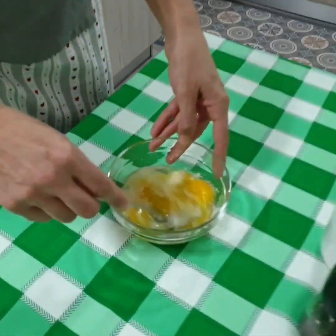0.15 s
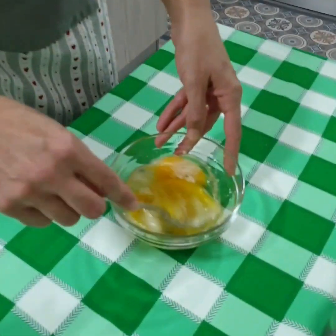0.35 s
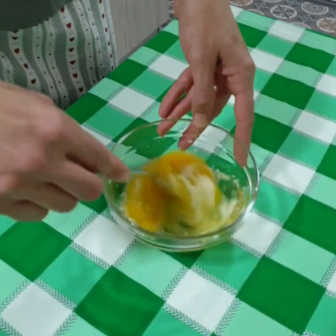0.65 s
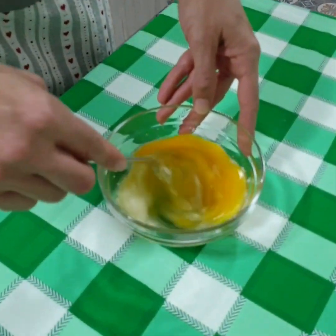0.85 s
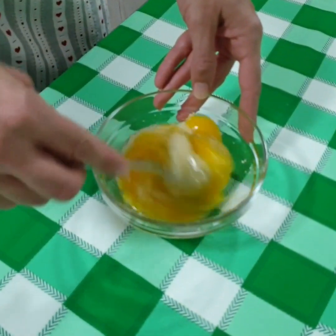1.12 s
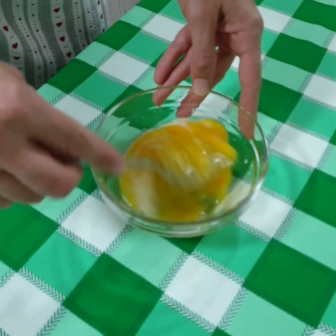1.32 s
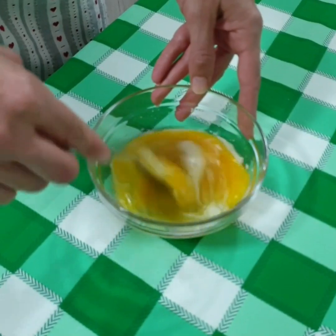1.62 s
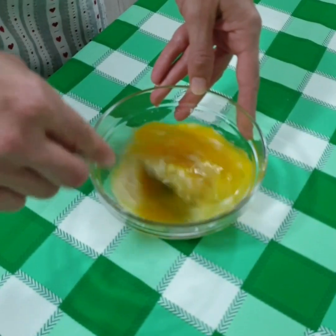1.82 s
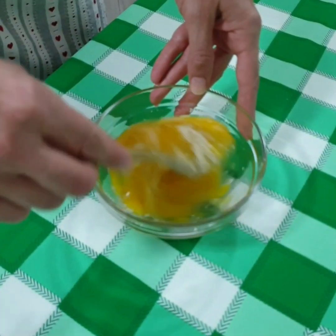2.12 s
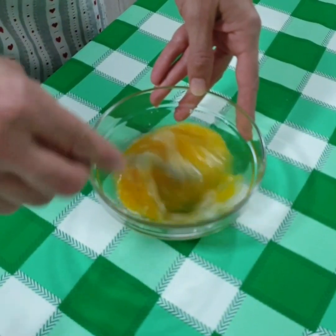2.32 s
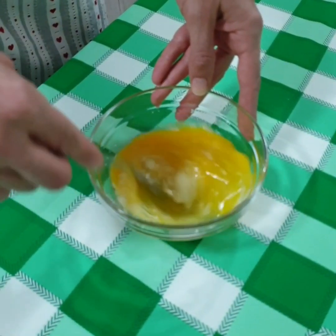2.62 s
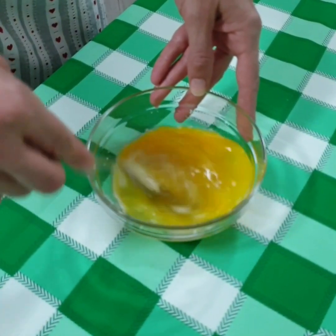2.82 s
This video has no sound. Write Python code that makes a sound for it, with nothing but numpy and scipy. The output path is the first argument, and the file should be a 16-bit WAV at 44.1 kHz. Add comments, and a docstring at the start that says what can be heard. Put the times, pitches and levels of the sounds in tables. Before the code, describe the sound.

A fork beats raw eggs in a glass bowl from 0 to about 2.9 seconds, five even strokes per second. Each brings a skid, bright ticks, dull clacks, usually a double knock, and a low table thump, with small wet plops and crackles. A short bright glass clink rings at 1.2, and a harsh metallic clash bounces at 1.8. Close stereo microphone, slightly left, lively kitchen, faint steady background noise.

```python
"""A hard-walled kitchen, a close stereo microphone: a fork beats raw eggs in a glass bowl on a table.
About five strokes a second, tines graze the side and knock on the bottom, usually twice: skidding noise,
short pings and dull clacks. Each knock thumps the table in low sines; the egg plops, gulps and crackles.
Once the bare glass rings in decaying modes, once the fork clashes and bounces on the wall.
Noise tails and standing waves make the room, over a steady noise floor."""
import sys
import numpy as np
from scipy import signal
from scipy.fft import rfft, irfft, next_fast_len
from scipy.io import wavfile
from scipy.ndimage import uniform_filter1d

SR = 44100
rng = np.random.default_rng(int(sys.argv[2]) if len(sys.argv) > 2 else 0)


def master(y):
    """Save y as 16-bit WAV."""
    cut = np.clip(np.atleast_2d(y).T, -1, 1)
    pcm = np.round(cut * 32767)  # scale
    wavfile.write(sys.argv[1], SR, pcm.astype(np.int16))


N = 130095

# Event and mode levels are relative; the trims further down shift them.
# tines knock on the bottom [t/s, tick level/dB, clack level/dB, thump level/dB, thump f/Hz, thump swell/s]
BOTTOM_KNOCKS = [(0.0329,-29,-39,-31,226,0.0038),(0.0588,-33,-36,-27.5,227,0.0037),(.228,-28.5,-41,-24.5,234,0.0036),(.2577,-26.5,-34,-25.5,246,.003),
                 (0.4228,-25,-34.5,-23.5,260.5,0.0039),(0.4494,-31.5,-35,-32.5,217,0.0037),(0.626,-26.5,-40.5,-24,265,0.0035),(.6516,-35,-35,-30,234,0.0043),
                 (.8185,-27,-65,-30,248,0.0032),(0.8344,-44,-42.5,-29.5,208,0.0032),(1.0193,-30.5,-47,-26.5,239,0.0049),(1.0432,-36,-41.5,-28,225,0.0033),
                 (1.213,-23.5,-38,-23,254,0.0035),(1.2431,-26,-31,-24.5,200,0.0032),(1.4142,-28.5,-38.5,-24,253.4,0.00344),(1.446,-33.5,-37.5,-28,206,0.0028),
                 (1.618,-30,-36,-23.5,228.5,0.0045),(1.654,-34,-37,-28,225,0.0034),(1.823,-29,-31.5,-22.5,235,0.0028),(1.855,-37,-37,-29,194,.003),
                 (2.027,-33,-35.5,-26,245.6,0.0031),(2.2279,-30,-36,-23,253.5,0.0041),(2.431,-30,-37,-26,226,0.0044),(2.4589,-34.5,-39,-30,244,0.0031),
                 (2.6426,-31.5,-44,-29.5,212,0.0056),(2.6638,-29,-33,-28,248,0.0028),(2.8648,-44,-36,-27.5,248,0.0032)]
# tines graze the side [t/s, tick level/dB, clack level/dB]
SIDE_GRAZES = [(.1968,-44,-43),(.4004,-62,-52),(.5969,-26,-32.5),(.7888,-34,-62),(.7957,-36,-46),(1.2033,-28.5,-42.5),(1.3853,-31,-35.5),
               (1.5857,-24,-35.5),(1.9947,-31.5,-40.5),(2.3878,-27.5,-46),(2.414,-55,-53),(2.606,-36,-43),(2.8056,-24,-31),(2.8985,-68,-60)]
# fork clashes on the wall [t/s, level/dB]
WALL_CLASHES = [(1.7967,-26.5),(1.7992,-18.5),(1.8084,-33),(1.822,-31)]
# fork rings the bare glass, one event [t/s, ring level/dB, crack level/dB]
GLASS_CLINK = (1.216,-6.5,-14.5)
# air pockets close in the egg [t/s, starting f/Hz, level/dB]
EGG_PLOPS = [(0.595,1116,-34.5),(.798,732,-43),(.982,900,-43.5),(1.02,616,-41.5),(1.412,880,-42.5),(1.68,590,-39),
             (1.80,748,-38),(2.342,900,-45),(2.342,1500,-51.5),(2.385,977,-45.5),(2.575,1260,-48.5),(2.603,900,-49.5),(2.802,1400,-43),(2.807,900,-41.5)]
# modes of the bowl damped by egg and fingers [f/Hz, relative level/dB, t60/s]
BOWL_MODES = [(900,-19,0.046),(1172,-18.5,0.043),(1400,-20.5,0.055),(2446,-19,0.091),(3114,-16,0.047),(4390,0,0.033),(4406,-7,0.02),(4800,-14.5,.07),(5000,-7,0.037),(6200,-3,0.033),(6497,2,0.031),(6550,-1.5,.035),(8920,-2,0.043),(11573,-9.5,0.039),(14493,-15,0.074)]
# dull modes of the full bowl, before chance detuning [f/Hz, relative level/dB, t60/s]
CLACK_MODES = [(880,-13,0.011),(1620,-49,0.0081),(2127,0.5,0.014),(2610,1,0.013),(3106,-0.5,0.011),(4170,-6,0.0085)]
# spectrum of tines skidding on glass [f/Hz, relative level/dB]
TICK_SPECTRUM = [(300,-9.5),(600,-10.5),(1100,-13),(2500,-11.5),(4200,-3),(5800,-2),(7300,3),(8600,-1.5),(9600,-8.5),(12500,-6.5),(15300,1.5),(17000,-7.5)]
# spectrum of the fork on the wall [f/Hz, relative level/dB]
CLASH_SPECTRUM = [(100,-17.5),(700,-10.5),(1100,-18.5),(2400,-11.5),(3200,1.5),(4200,-0.5),(5800,-4.5),(7500,1),(9100,-9.5),(10400,-5),(13000,-8.5),(16000,-20)]
# spectrum of the crack on bare glass [f/Hz, relative level/dB]
CRACK_SPECTRUM = [(200,-5),(1200,3),(3200,-11),(5000,9.5),(8000,1.5),(12000,1),(16000,7)]
# colour of the kitchen's reflections [f/Hz, relative level/dB]
ROOM_SPECTRUM = [(60,-20.5),(150,-16),(270,-5),(380,-9.5),(520,-2.5),(850,2),(2200,-1.5),(4500,-2),(8000,-4),(12000,-0.5),(16000,1.5)]
# spectrum of the noise floor [f/Hz, relative level/dB]
FLOOR_SPECTRUM = [(25,-14),(60,-12.5),(130,1.5),(260,-5),(500,-25.5),(1000,-29),(3000,-27),(8000,-20.5),(16000,-23)]
# decay of the kitchen's diffuse tail [f/Hz, t60/s]
ROOM_DECAY = [(100,0.66),(500,0.58),(1500,0.57),(4000,0.42),(9000,0.32),(16000,.25)]
# low standing waves between the walls [f/Hz, relative level/dB, t60/s]
STANDING_WAVES = [(64,-1,0.59),(98.7,-6.5,0.67),(136.9,6,0.52),(184.2,-5.5,0.56),(223,-5.5,0.32),(249,-7,0.32),(286.8,1,0.41)]

TICK_RISE_S, TICK_FALL_S = 0.0015, 0.0012
TICK_TRIM_DB, CLACK_TRIM_DB, THUMP_TRIM_DB = -2, -2.5, -0.5
SKID_TO_TICK_DB, SKID_BUILD_S = -8.5, 0.0049
GRIT = 0.77  # how far a few micro-impacts stand out of a skid
TINE_HZ = [7160, 7800, 8360, 10220, 11320, 13300, 15300]  # before chance detuning
TINE_T60_S, TINE_TO_TICK_DB, TINE_SCATTER_DB = 0.0076, -6, 6.5

THUMP_WIDTH_S = 0.0033  # a swell of this length keeps its plain shape
SHOVE_HZ, SHOVE_TO_THUMP_DB, SHOVE_PEAK_S = 120.1, -20, 0.013

PLOP_RISE_S, PLOP_FALL_S, PLOP_GLIDE_PER_S, PLOP_FROTH = 0.002, 0.0041, 7.1, 0.42
CRACKLE_DB, CRACKLE_FALL_S, CRACKLE_POPS_PER_S = -50, 0.015, 450
GULP_HZ, GULP_TO_THUMP_DB = 552, -27.5
BUBBLE_HZ, BUBBLE_SCATTER_OCTAVES, BUBBLE_CYCLES = 2490, 0.37, 4.3
BUBBLE_DB, BUBBLE_SCATTER_DB, BUBBLE_SPREAD_S = -51, 2.5, 0.018

LATE_DB, EARLY_DB, EARLY_FALL_S = -2.5, -6, 0.0066  # before the room's colour
STANDING_DB, FLOOR_DB = -57.9576, -54
STROKE_S = 0.2
# sends to the kitchen, relative to the direct sound
THUMP_SEND_DB, EGG_SEND_DB, CLINK_SEND_DB, CLASH_SEND_DB = -1, -4.5, -5, 5.5
MID_LEFT_DB = 6.5  # left port over right port at 1300 Hz
PORT_LAG_S = 0.00009
TOP_HZ = 15700


def undb(db):
    """Decibels to amplitude gain."""
    return np.exp(np.asarray(db) * np.log(10) / 20)


def clock(s):
    """Sample times over s seconds."""
    return np.arange(int(s * SR)) / SR


def curve(points, hz):
    """Read a table on a log-frequency axis."""
    p = np.array(points, float)
    return np.interp(np.log(np.maximum(hz, 1)), np.log(p[:, 0]), p[:, 1])


def colour(x, points, size=2048):
    """Minimum-phase filter with the given spectrum: no sound arrives ahead of its cause."""
    log_gain = curve(points, np.arange(size // 2 + 1) * SR / size) * np.log(10) / 20
    cepstrum = irfft(log_gain)
    # folding the cepstrum onto positive times makes the filter causal
    cepstrum[1:size // 2] *= 2
    cepstrum[size // 2 + 1:] = 0
    taps = irfft(np.exp(rfft(cepstrum)))
    if x.ndim > 1:
        taps = taps[None]
    return signal.oaconvolve(x, taps, axes=-1)[..., :x.shape[-1]]


def burst(x, db):
    """Give a short sound the energy of 2.5 ms at this RMS level."""
    return x * undb(db) * np.sqrt(0.0025 * SR / np.sum(x ** 2))


def add(out, s, x):
    """Mix x into out at time s."""
    i = max(int(s * SR), 0)
    out[i:i + len(x)] += x[:N - i]


def ring(modes, seconds, spread=0.0):
    """A struck body: decaying sine modes, detuned by chance when spread is above zero."""
    t = clock(seconds)
    total = np.zeros(len(t))
    for hz, db, t60 in modes:
        detuned = hz * (1 + spread * rng.standard_normal())
        total += undb(db - 60 * t / t60) * np.sin(2 * np.pi * detuned * t)
    return total


def pair(n):
    """Noise at two microphone ports: much alike in the bass, unrelated in the treble."""
    m = 2 * next_fast_len(n // 2 + 1)
    hz = np.arange(m // 2 + 1) * SR / m
    likeness = np.clip(0.85 * np.sinc(hz / 1200), -1, 1)
    mid = irfft(rfft(rng.standard_normal(m)) * np.sqrt((1 + likeness) / 2))[:n]
    side = irfft(rfft(rng.standard_normal(m)) * np.sqrt((1 - likeness) / 2))[:n]
    return np.array([mid + side, mid - side])


def chatter(spectrum, db, rise_s, fall_s):
    """Metal skids on glass in uneven micro-impacts, peaking 5 ms in."""
    t = clock(0.03) - 0.005
    shape = np.exp(np.minimum(t / rise_s, -t / fall_s))
    impacts = rng.standard_normal(len(t)) * np.exp(GRIT * rng.standard_normal(len(t)))
    return burst(colour(shape * impacts, spectrum), db)


def noise_floor():
    """A steady coloured noise at both ports lies under everything."""
    floor = colour(pair(N), FLOOR_SPECTRUM)
    return undb(FLOOR_DB) * floor / floor.std()


def tines():
    """Every contact: a skid builds to a bright tick, a damped clack and pings that vary by chance."""
    out, t = np.zeros(N), clock(0.02)
    skid_shape = np.exp((t - t[-1]) / SKID_BUILD_S)
    for s, tick_db, clack_db, *_ in list(BOTTOM_KNOCKS) + list(SIDE_GRAZES):
        db = tick_db + TICK_TRIM_DB
        add(out, s - 0.005, chatter(TICK_SPECTRUM, db, TICK_RISE_S, TICK_FALL_S))
        skid = colour(skid_shape * rng.standard_normal(len(t)), TICK_SPECTRUM)
        add(out, s - t[-1], burst(skid, db + SKID_TO_TICK_DB))
        pings = [(f, TINE_SCATTER_DB * rng.standard_normal(), TINE_T60_S) for f in TINE_HZ]
        add(out, s, burst(ring(pings, 0.03, spread=0.016), db + TINE_TO_TICK_DB))
        clacks = [(f, level + 3 * rng.standard_normal(), t60) for f, level, t60 in CLACK_MODES]
        add(out, s - 0.0007, burst(ring(clacks, 0.05, spread=0.035), clack_db + CLACK_TRIM_DB))
    return out


def kitchen(x):
    """Early reflections, a diffuse tail that dulls as it fades, and low standing waves."""
    t = clock(0.7)
    hz = np.arange(len(t) // 2 + 1) * SR / len(t)
    noise, tail = rfft(pair(len(t))), 0
    # overlapping bands, each with its own decay
    for k, (_, t60) in enumerate(ROOM_DECAY):
        share = curve([(f, j == k) for j, (f, _) in enumerate(ROOM_DECAY)], hz)
        tail = tail + irfft(noise * share, len(t)) * undb(-60 * t / t60)

    def unit(h):
        """Unit energy per port, averaged over the two."""
        return h / np.sqrt(np.sum(h ** 2) / 2)

    late = unit(tail * (1 - np.exp(-(t / 0.0076) ** 2)))
    early_shape = np.exp(-t / EARLY_FALL_S) * (1 - np.exp(-(t / 0.00033) ** 2))
    early = unit(pair(len(t)) * early_shape)
    response = colour(undb(LATE_DB) * late + undb(EARLY_DB) * early, ROOM_SPECTRUM)
    response = response + undb(STANDING_DB) * ring(STANDING_WAVES, 0.7)
    return signal.fftconvolve(response, x[None], axes=1)[:, :N]


def reflections(x, count=3):
    """Hands and fork move, so neighbouring strokes meet different reflections, used in rotation."""
    turn = np.arange(N) / SR / STROKE_S
    total = np.zeros((2, N))
    for k in range(count):
        distance = abs((turn - k + 1) % count - 1)
        total += kitchen(x * np.sqrt(np.clip(1 - distance, 0, 1)))
    return total


def bubbles(count=4):
    """At each knock the egg gulps once, then a few small bubbles snap: short decaying sine grains."""
    out, t = np.zeros(N), clock(0.04)

    def grain(hz):
        """A sine that swells and dies within a few cycles."""
        return hz * t * np.exp(-2 * hz * t / BUBBLE_CYCLES) * np.sin(2 * np.pi * hz * t)

    for s, _, _, thump_db, *_ in BOTTOM_KNOCKS:
        gulp_hz = GULP_HZ * (1 + 0.058 * rng.standard_normal())
        add(out, s, burst(grain(gulp_hz), thump_db + GULP_TO_THUMP_DB))
        for when, pitch, size in rng.standard_normal((count, 3)):
            bubble_hz = BUBBLE_HZ * 2 ** (BUBBLE_SCATTER_OCTAVES * pitch)
            snap = burst(grain(bubble_hz), BUBBLE_DB + BUBBLE_SCATTER_DB * size)
            add(out, s + BUBBLE_SPREAD_S * abs(when), snap)
    return out


def crackle():
    """Wet egg crackles in sparse random pops, faint throughout and strong after each knock."""
    stir, t = np.zeros(N), clock(0.12)
    for s, *_ in BOTTOM_KNOCKS:
        add(stir, s, np.exp(-t / CRACKLE_FALL_S))
    struck = rng.random(N) < CRACKLE_POPS_PER_S / SR
    pops = colour(struck * rng.standard_normal(N), TICK_SPECTRUM)
    return undb(CRACKLE_DB) * (stir + 0.038) * pops / pops.std()


def table():
    """Each knock pushes the bowl into the table: low cycles swell and die, over a slower shove."""
    out, t = np.zeros(N), clock(0.1)
    shove_swell = (t / SHOVE_PEAK_S * np.exp(1 - t / SHOVE_PEAK_S)) ** 2
    shove = undb(SHOVE_TO_THUMP_DB) * shove_swell * np.sin(2 * np.pi * SHOVE_HZ * t)
    for s, _, _, db, hz, swell_s in BOTTOM_KNOCKS:
        u = t / swell_s
        swell = (u * np.exp(1 - u)) ** (swell_s / THUMP_WIDTH_S)
        thump = undb(db + THUMP_TRIM_DB) * (swell * np.sin(2 * np.pi * hz * t) + shove)
        add(out, s + 0.0008, thump)
    return out


def plops():
    """Air pockets close in the egg: short sines rise in pitch, roughened by slow noise as froth."""
    out, t = np.zeros(N), clock(0.12)
    shape = (1 - np.exp(-t / PLOP_RISE_S)) ** 2 * np.exp(-t / PLOP_FALL_S)
    shape = shape / shape.max()
    for s, hz, db in EGG_PLOPS:
        froth = uniform_filter1d(rng.standard_normal((2, len(t))), size=70)
        in_phase, quadrature = PLOP_FROTH * froth / froth.std()
        phase = 2 * np.pi * hz * (t + PLOP_GLIDE_PER_S * t ** 2 / 2)
        tone = (1 + in_phase) * np.sin(phase) + quadrature * np.cos(phase)
        add(out, s, undb(db) * shape * tone)
    return out


def clink():
    """The fork meets bare glass: a noisy crack, then the damped bowl's brief high modes."""
    out = np.zeros(N)
    s, ring_db, crack_db = GLASS_CLINK
    onset = 1 - np.exp(-clock(0.25) / 0.001)
    add(out, s, burst(ring(BOWL_MODES, 0.25) * onset, ring_db))
    add(out, s - 0.0045, chatter(CRACK_SPECTRUM, crack_db, rise_s=0.0004, fall_s=0.005))
    return out


def clashes():
    """The fork hits the wall and bounces: harsh metallic clicks of gritty noise."""
    out = np.zeros(N)
    for s, db in WALL_CLASHES:
        click = chatter(CLASH_SPECTRUM, db, rise_s=0.00067, fall_s=0.0016)
        add(out, s - 0.005, click)
    return out


def scene():
    """The bowl sits close, a little left of the microphone, with the kitchen around it."""
    floor = noise_floor()
    ticks, thumps, wet = tines(), table(), bubbles() + crackle() + plops()
    glass, metal = clink(), clashes()
    near = ticks + thumps + wet + glass + metal
    # the right port hears the bowl a few samples later
    lagged = np.interp(np.arange(N) - round(PORT_LAG_S * SR), np.arange(N), near)
    # left-port tilt [f/Hz, level/dB]; the right port gets its opposite
    tilt = [(500, -0.071), (1300, MID_LEFT_DB / 2), (4500, -1.5), (9000, -1.9), (15000, 0.43)]
    opposite = [(f, -level) for f, level in tilt]
    direct = np.array([colour(near, tilt), colour(lagged, opposite)])
    send = ticks + undb(THUMP_SEND_DB) * thumps + undb(EGG_SEND_DB) * wet
    send = send + undb(CLINK_SEND_DB) * glass + undb(CLASH_SEND_DB) * metal
    return direct + reflections(send) + floor


def record(dry):
    """The recorder cuts the top with a steep low-pass."""
    return signal.sosfilt(signal.ellip(8, 0.2, 70, TOP_HZ, fs=SR, output="sos"), dry)


dry = scene()
out = record(dry)
master(out)
```